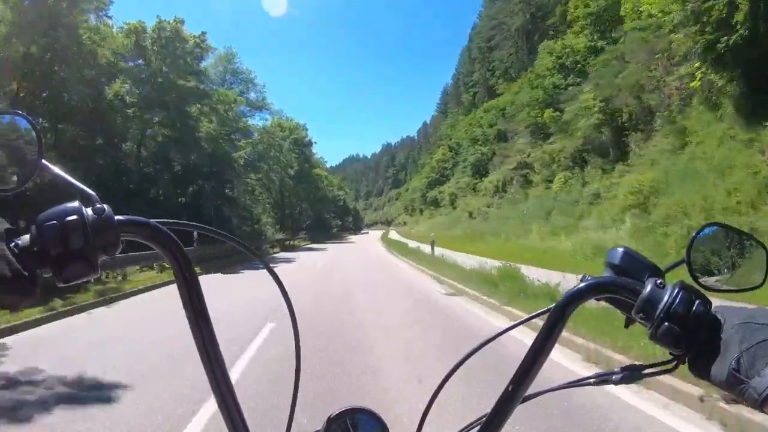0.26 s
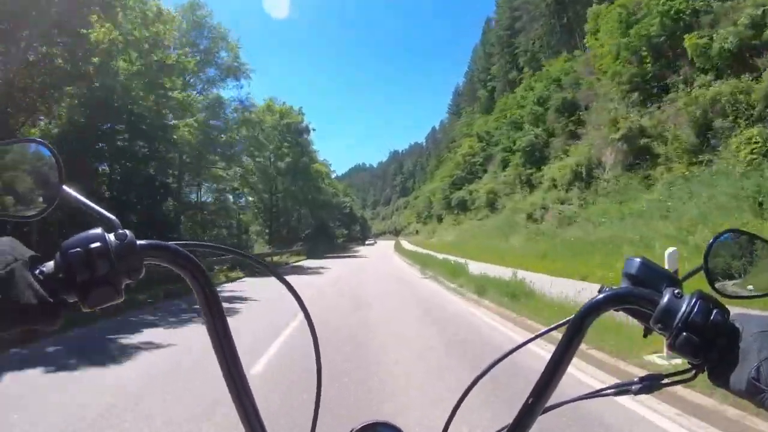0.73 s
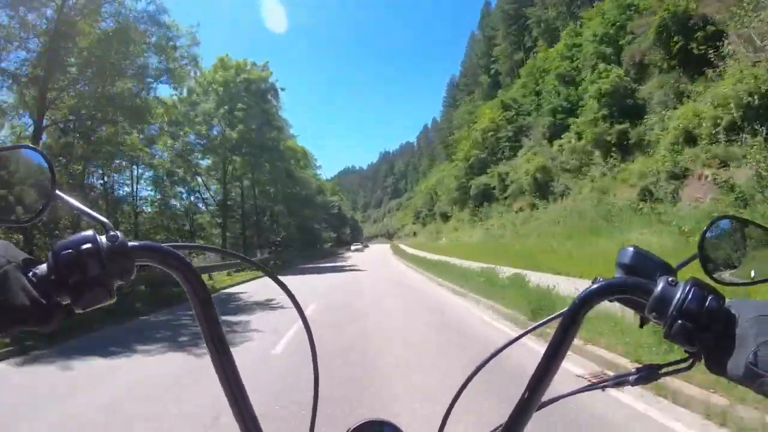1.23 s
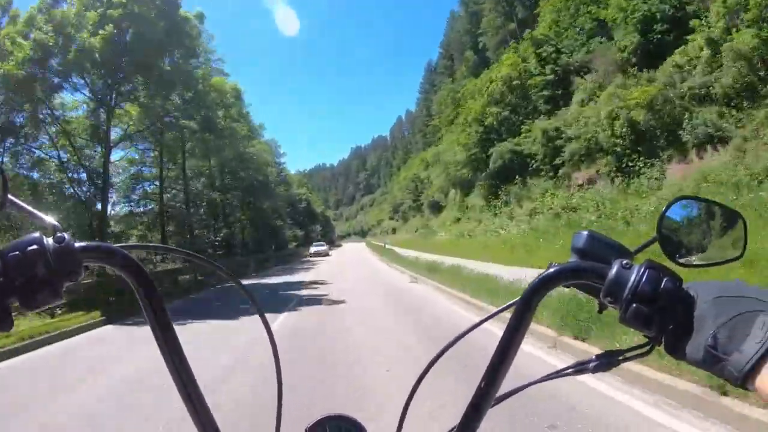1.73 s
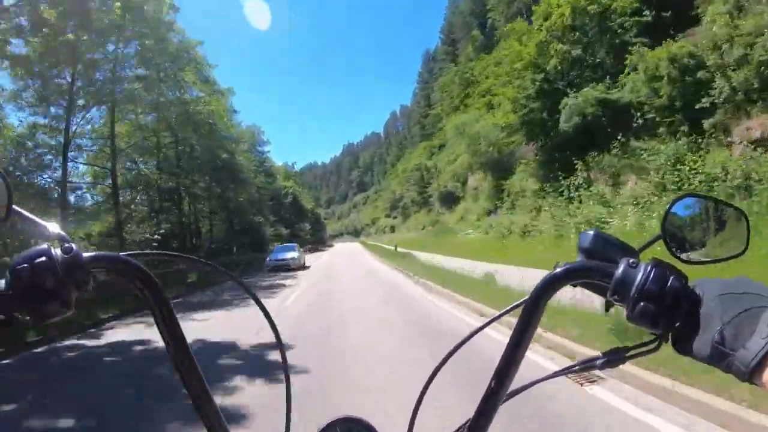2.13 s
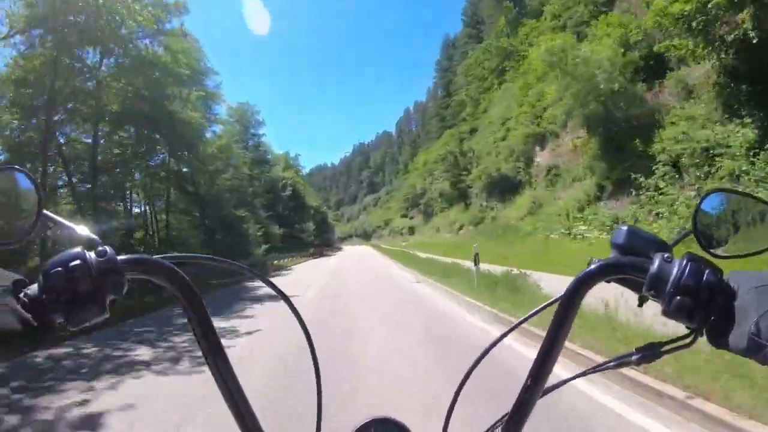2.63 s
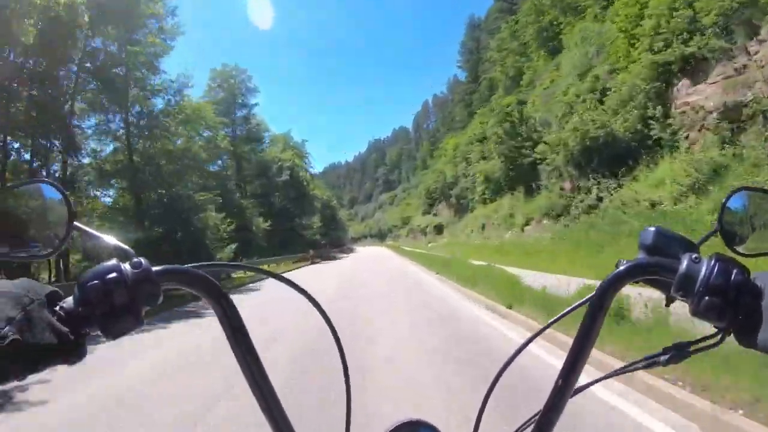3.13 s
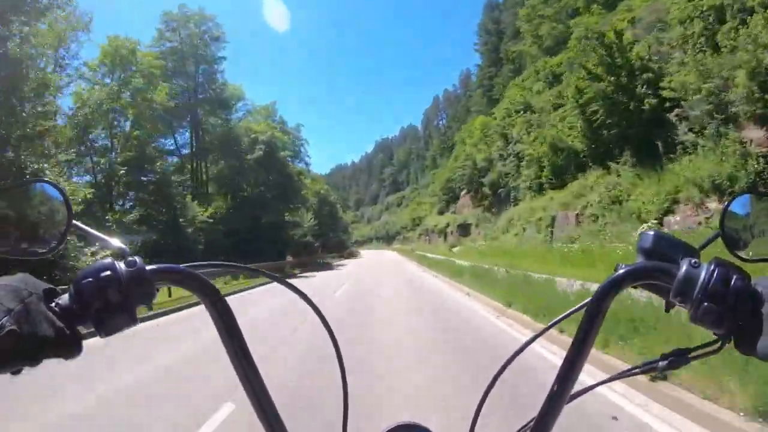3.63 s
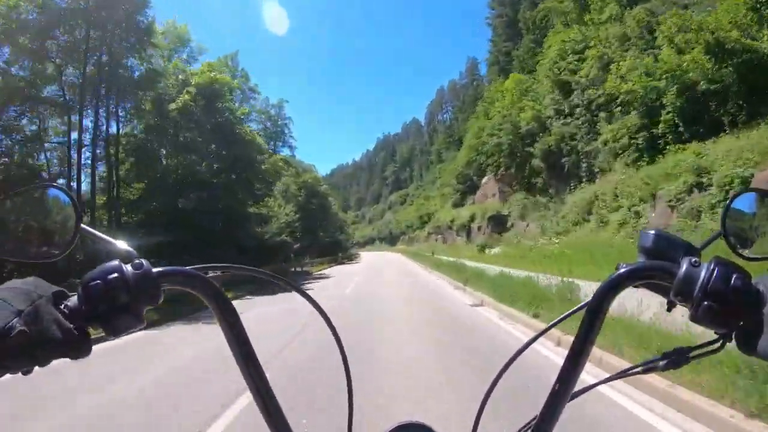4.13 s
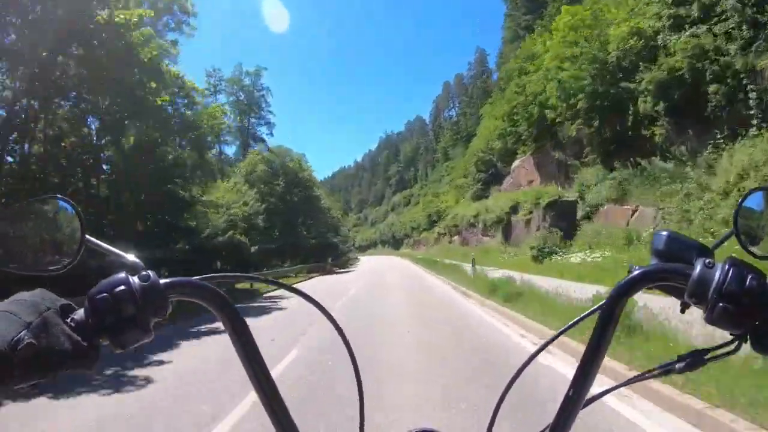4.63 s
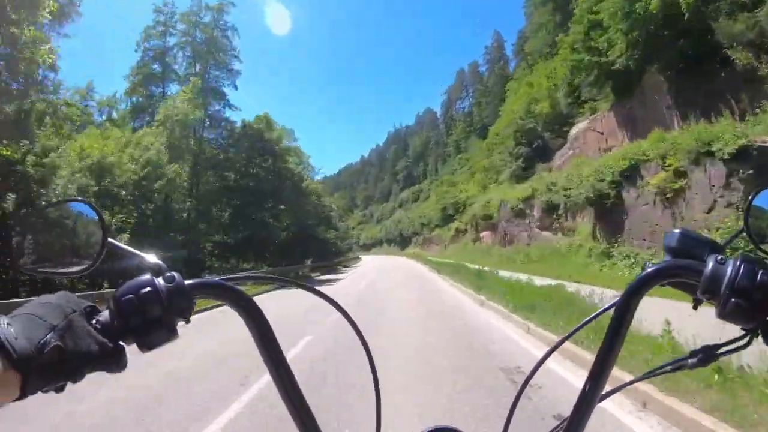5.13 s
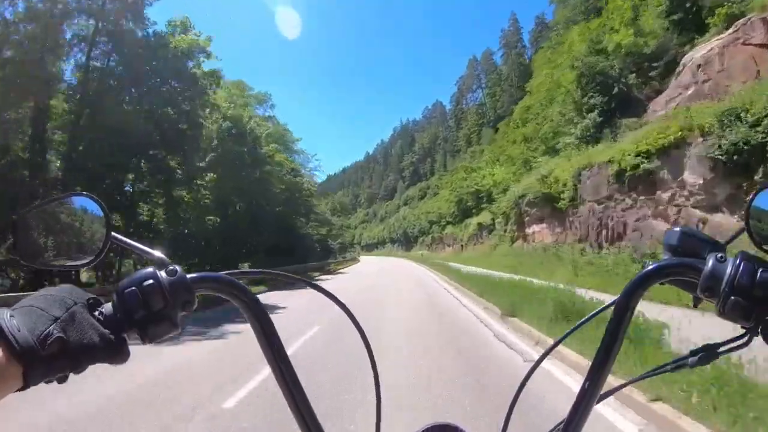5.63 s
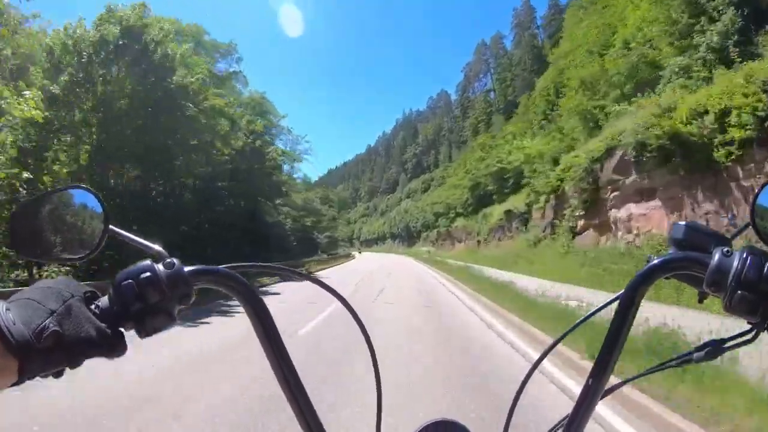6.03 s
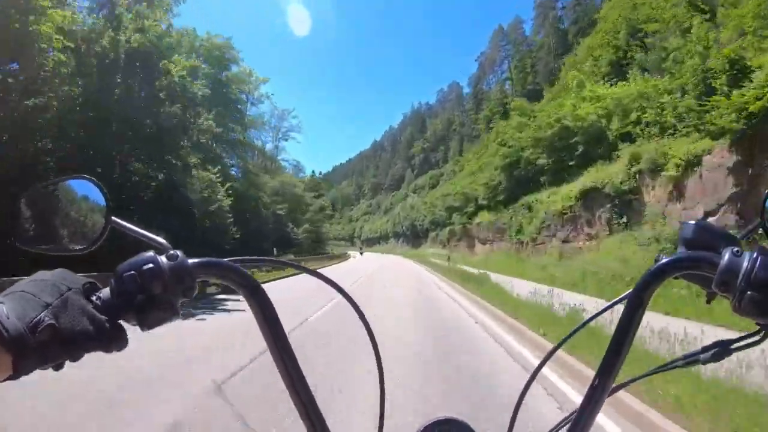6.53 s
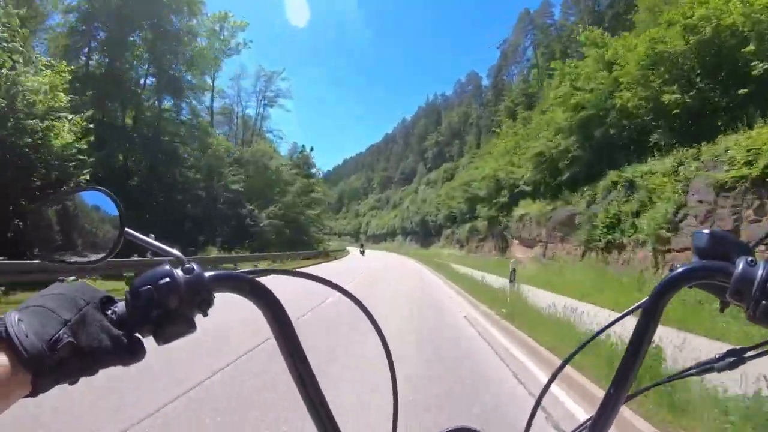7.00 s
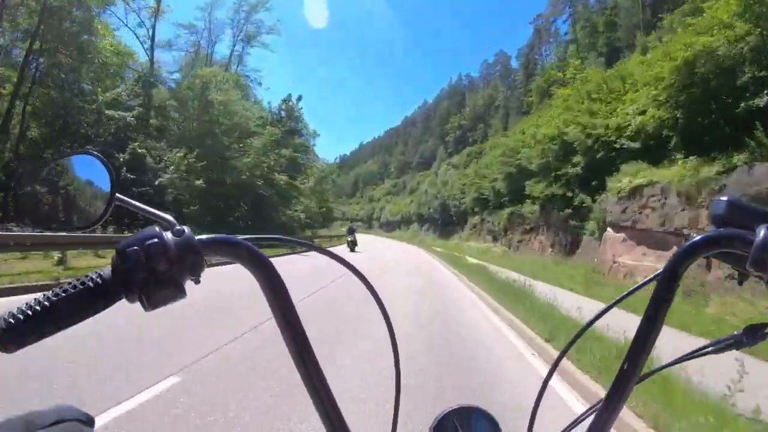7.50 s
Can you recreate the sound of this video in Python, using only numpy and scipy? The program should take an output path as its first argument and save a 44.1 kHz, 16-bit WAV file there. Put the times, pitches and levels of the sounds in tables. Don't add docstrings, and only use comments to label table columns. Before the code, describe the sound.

Close onboard motorcycle sound outdoors: a deep, lumpy exhaust drone, dry mechanical clatter with a thin metallic singing, faint tyre hiss and constant wind turbulence. An oncoming car whooshes past in the first three seconds while a bump shakes loose parts. Steady cruising follows, then the engine slackens, stumbles irregularly and settles slightly slower under increasingly strong wind buffets and a last bump.

```python
import sys
import numpy as np
from scipy import signal
from scipy.fft import rfft, irfft
from scipy.io import wavfile
from scipy.ndimage import uniform_filter1d, map_coordinates

SR = 44100
rng = np.random.default_rng(int(sys.argv[2]) if len(sys.argv) > 2 else 0)


def materialize(psi):
    bounded = np.clip(np.atleast_2d(psi).T, -1, 1)
    quanta = np.round(bounded * 32767).astype(np.int16)
    wavfile.write(sys.argv[1], SR, quanta)


def natural_amplitude(level_db):
    exponent = np.asarray(level_db, float) / 20
    return 10 ** exponent


N = 342216
TIME_S = np.arange(N) / SR
LEAD = 1400
EASE_S, SHUT_S, SHUTTING_S = 5.22, 5.92, 0.11


def unit(x):
    return x / np.sqrt(np.mean(x ** 2) + 1e-20)


def along(points, hz):
    f, v = np.transpose([*points, (30000, -160)])
    return np.interp(np.log(hz + 1), np.log(f + 1), v)


def curve(rows):
    s, value = np.transpose(rows)
    return np.interp(TIME_S, s, value)


def wobble(rate_hz):
    knots = rng.standard_normal(int(N * rate_hz / SR) + 4)
    return map_coordinates(knots, [np.arange(N) * rate_hz / SR])


def coloured(x, spectrum):
    m = 2 ** 19
    cep = irfft(np.log(natural_amplitude(along(spectrum, np.fft.rfftfreq(m, 1 / SR)))), m)
    cep[1:m // 2] *= 2
    cep[m // 2 + 1:] = 0
    running = np.concatenate([x[-LEAD:], x])
    return irfft(rfft(running, m) * np.exp(rfft(cep)), m)[LEAD:][:N]


def rush(spectrum, patchy_db):
    z = signal.stft(rng.standard_normal(N), nperseg=512)[2]
    field = uniform_filter1d(rng.standard_normal(z.shape), size=6, axis=0)
    field = uniform_filter1d(field, size=10, axis=1)
    patchy = signal.istft(z * natural_amplitude(patchy_db * unit(field)), nperseg=512)[1][:N]
    return unit(coloured(patchy, spectrum))


def levelled(x, size, floor):
    return x / np.sqrt(np.abs(uniform_filter1d(x ** 2, size=size)) + floor)


def swells(rows):
    return sum(height * np.exp(-(2 * (TIME_S - s) / length_s) ** 2) for s, height, length_s in rows)


def stroke(turns, at, sharp):
    return np.exp(sharp * (np.cos(2 * np.pi * (turns - at)) - 1))


def shut(start_s):
    return np.clip((TIME_S - start_s) / SHUTTING_S, 0, 1)


# time_s, speed_cycles_per_s (four-stroke)
ENGINE = [(0.0, 22.082), (0.3, 22.053), (0.6, 22.187), (2.4, 22.628), (2.7, 22.625), (3.0, 22.71),
          (4.2, 22.716), (4.5, 22.802), (4.8, 22.654), (5.1, 22.653), (5.4, 22.615), (6.0, 22.455),
          (6.2, 21.967), (6.6, 22.135), (6.8, 21.741), (7.0, 21.744), (7.2, 21.631), (7.76, 21.61)]


def engine_speed():
    return curve(ENGINE)


# time_s, load_db
LOAD = [(0, -2), (.5, -3), (.9, -2), (1.35, 1), (2.0, 0), (2.65, -4.5), (2.95, -3.5), (3.3, -2), (4.2, -1),
        (5.15, 0.5), (5.35, -2.5), (5.65, -3.5), (6.0, -1), (6.4, -3), (6.95, -6), (7.2, -3), (7.76, -4)]


def engine_load():
    return curve(LOAD)


# time_s, unevenness_0_to_1
RAGGED = [(0, .05), (5.4, .05), (5.9, .12), (6.15, .55), (6.6, .45), (6.85, .17), (7.3, .12), (7.76, .12)]
# pitch_hz, level_db
PIPE = [(15, -40), (45, -13), (68, -17), (90, -1), (113, -2), (136, 5), (158, -3), (204, -2.7), (228, -13),
        (260, -23), (295, -28), (362, -29), (450, -37), (900, -70)]
# pitch_hz, gain_db
COASTING = [(15, -2.5), (110, 2.5), (131, 1.5), (152, -3), (196, 1), (260, -6), (20000, -5)]
# pitch_hz, gain_db
LEAN = [(15, 0), (112, 0), (134, -10), (158, -5), (190, 0), (20000, 0)]
# pitch_hz, level_db
BARK = [(120, -40), (160, -12), (181, 1), (204, -5), (227, -6), (250, -4), (272, -4), (286, 3), (298, 3),
        (308, -8), (318, -5), (340, -11), (362, -2), (400, -11), (500, -18), (800, -36), (2000, -80)]


def exhaust(turns):
    rear_at_cycle, rear_db = 405 / 720, 1.4
    ragged = curve(RAGGED)
    whole = np.arange(int(turns[-1]) + 1)
    fire_turns = np.stack([whole, whole + rear_at_cycle], axis=1).ravel()
    fire = np.interp(fire_turns, turns, np.arange(N))
    late, strong = rng.standard_normal((len(fire), 2)).T
    rough = ragged[fire.astype(int)]
    fire = np.clip(fire + rough * late * .0022 * SR, 0, N - 1).astype(int)
    size = natural_amplitude(9 * rough * strong + np.resize([0, rear_db], len(fire)))

    both = np.bincount(fire, size, minlength=N)
    pull = unit(coloured(both - both.mean(), PIPE))
    closed = shut(SHUT_S)
    drone = (1 - closed) * pull + closed * coloured(pull, COASTING)
    lean = np.clip(3 * ragged - .35, 0, 1)
    drone = (1 - lean) * drone + lean * coloured(drone, LEAN)
    drone = natural_amplitude(1.8 * wobble(6)) * drone

    near = np.bincount(fire[::2], size[::2], minlength=N)
    bark = natural_amplitude(-15) * unit(coloured(near, BARK))
    return natural_amplitude(-13.57 + engine_load()) * (drone - bark)


# pitch_hz, density_db_per_hz
CASE = [(1200, -22), (1900, -7.5), (2500, -3), (3100, -7.5), (4000, -16.5), (5200, -21.5), (6000, -28.5),
        (8000, -66.5)]
# pitch_hz, width_hz, level_db
FINS = [(2178, 18, -4), (2225, 20, -11), (2360, 22, -3), (2400, 30, -9), (2475, 20, -11), (2540, 160, -6),
        (2655, 25, -8), (2790, 70, -13), (3000, 50, -14)]


def valve_gear(turns):
    beat = 1 + 0.099 * stroke(turns, 0.034, 8.1) + 0.47 * stroke(turns, 0.57, 4.1)
    ticks = coloured(rng.standard_normal(N) * natural_amplitude(1.9 * wobble(700)), CASE)
    case = unit(beat * (rush(CASE, patchy_db=-0.5) + 0.36 * unit(ticks)))

    hz = np.fft.rfftfreq(N, 1 / SR)
    fins = sum(natural_amplitude(db) * 1j * hz * w / (c * c - hz * hz + 1j * hz * w) for c, w, db in FINS)
    ring = levelled(unit(irfft(rfft(ticks) * fins, N)), 1500, .05)

    eased = shut(EASE_S)
    stream_db = air_stream()
    stream_db = stream_db - stream_db.mean()
    match = np.exp(-((engine_speed() - 22.3) / .1) ** 2)
    sing_db = -0.9 - 0.73 * stream_db - 10.5 * eased + 3 * match
    clatter_db = -40 + 0.94 * engine_load() + 2.5 * eased
    clatter_db = clatter_db + 0.11 * gusts() + 0.4 * stream_db
    return natural_amplitude(clatter_db) * (case + natural_amplitude(sing_db) * ring)


# pitch_hz, match_cycles_per_s, reach_cycles_per_s, level_db
WHINES = [(2360, 22.3, .12, -40.5), (2178, 22.68, .07, -50)]


def whine():
    speed, load_db = engine_speed(), engine_load()
    out = np.zeros(N)
    for hz, at, reach, db in WHINES:
        level = natural_amplitude(db + 1.5 * load_db + 1.1 * wobble(11))
        match = np.exp(-((speed - at) / reach) ** 2)
        out += level * match * np.sin(2 * np.pi * hz * TIME_S + 0.4 * wobble(25))
    return (1 - shut(EASE_S)) * out


# time_s, level_db
WIND = [(0, -26.5), (.44, -31), (.69, -34.5), (1.1, -33), (1.72, -33.5), (1.95, -28.5), (2.6, -30),
        (2.82, -35.5), (2.9, -32.5), (3.4, -31.5), (4.4, -31.5), (5.3, -32), (5.7, -34.5), (6.85, -34.5),
        (7.2, -32.5), (7.45, -32.5), (7.76, -26.5)]


def air_stream():
    return curve(WIND)


# time_s, level_db
HEAVE = [(0, -40), (2, -35.5), (4.2, -31), (4.7, -23.5), (5.8, -23.5), (6.3, -19), (6.8, -30), (7.76, -36)]
# pitch_hz, density_db_per_hz
DEEP = [(10, -25), (25, -5.5), (38, -0.5), (55, -10), (90, -31.5)]
# pitch_hz, density_db_per_hz
RUMBLE = [(10, -25), (25, -12.5), (40, -4.5), (75, -2.5), (100, -8.5), (140, -11), (215, -10), (250, -18),
          (300, -24), (450, -31.5), (900, -61.5)]
# pitch_hz, density_db_per_hz
FLUTTER = [(120, -23), (250, -2.5), (400, -4.5), (700, -12), (1200, -13.5), (1800, -21), (3500, -27.5),
           (5500, -46.5), (7000, -84)]


def wind(turns):
    gust_db = gusts()
    heave = natural_amplitude(curve(HEAVE)) * rush(DEEP, patchy_db=0.5)

    slow = wobble(12)
    eddies = levelled(rush(RUMBLE, patchy_db=.6), 6000, .1)
    low = unit(natural_amplitude(1.1 * slow + .6 * wobble(5)) * eddies)
    rumble = natural_amplitude(-17.5 + .05 * gust_db) * low

    lumps = natural_amplitude(0.23 * slow + 0.49 * wobble(90)) * (1 + 0.24 * stroke(turns, 0.11, 11))
    flutter = unit(lumps * rush(FLUTTER, patchy_db=0.8))
    return heave + rumble + natural_amplitude(air_stream() + 0.11 * gust_db + 3) * flutter


# pitch_hz, density_db_per_hz
HISS = [(2500, -20), (4200, 5), (5500, 3), (6200, 0), (7800, -1), (9000, -7), (9500, -16), (10700, -14),
        (11300, -23), (12000, -30), (13400, -28), (14300, -44), (16000, -55)]


def road():
    return natural_amplitude(-51.5 + 0.27 * engine_load() - 2 * shut(EASE_S)) * rush(HISS, patchy_db=.8)


# centre_s, level_db, length_s
SURGES = [
    (0.093, -24.5, 0.097),
    (0.33, -22.5, 0.24),
    (1.816, -7, 0.058),
    (1.89, -23, .06),
    (2.756, -18, 0.084),
    (5.383, -22, 0.062),
    (6.095, -25.5, 0.11),
    (6.596, -28, 0.087),
    (7.163, -29, .1),
    (7.4, -27.5, 0.13),
]
# pitch_hz, density_db_per_hz
SURGE = [(40, -27), (100, 3.5), (220, 0.5), (400, -3.5), (700, -27), (1500, -42.5)]


def surges():
    return swells([(s, natural_amplitude(db), length_s) for s, db, length_s in SURGES]) * rush(SURGE, patchy_db=6.5)


# start_s, peak_db, brightness_db
SLAPS = [(0.291, -21, 1), (0.336, -15, -10), (0.365, -24.5, -12), (0.43, -15.5, -12), (0.452, -22.5, -6.5),
         (1.06, -23, -11), (1.168, -27, -25), (1.82, -13.5, -22), (1.876, -25.5, -16), (1.937, -19.5, -27),
         (2.515, -18.5, -14), (2.566, -19, -9), (2.77, -17.5, -23), (2.838, -16, -28), (3.429, -19, -25),
         (4.156, -20, -5), (4.416, -22.5, -8), (5.127, -21, -28), (5.267, -12, -16), (5.318, -16, -26),
         (5.369, -12, -9), (5.381, -14.5, -7.5), (5.41, -21, -23), (5.934, -19, -14), (6.344, -12.5, -27),
         (6.405, -18, -18), (6.577, -29, -22), (6.609, -21, -2), (6.63, -16.5, -18), (6.749, -21, -5),
         (6.873, -18.5, -34), (6.942, -10, -15), (7.098, -14, -10), (7.106, -16, -17), (7.149, -19, -7),
         (7.158, -12.5, -11.5), (7.189, -12.5, -30), (7.332, -24, -16), (7.367, -12, -18),
         (7.414, -15.5, -10), (7.475, -21.5, -6), (7.612, -20, -19), (7.703, -10, -12), (7.712, -8.5, -9),
         (7.716, -17.5, -12), (7.72, -17.5, -10), (7.73, -14, -10)]


def slaps():
    dull, bright, t = np.zeros(N + SR), np.zeros(N + SR), np.arange(SR // 20) / SR
    for s, db, bright_db in SLAPS:
        puff = rng.standard_normal((2, len(t))) * (1 - np.exp(-t / .001)) * np.exp(-t / .0035)
        puff /= np.linalg.norm(puff, axis=1, keepdims=True)
        puff[0] *= .5
        puff[0, 40] -= 1.4
        start = round((s + .0015) * SR)
        dull[start:][:len(t)] += natural_amplitude(db) * puff[0]
        bright[start:][:len(t)] += natural_amplitude(db + bright_db) * puff[1]
    thump_hz_db = [(60, -40), (250, 9.5), (700, -2.5), (1500, -12.5), (3000, -31), (8000, -58.5)]
    edge_hz_db = [(500, -29.5), (900, -0.5), (1400, 7), (1900, 5), (3000, -1.5), (5000, -15.5), (7000, -71)]
    return natural_amplitude(27) * coloured(dull[:N], thump_hz_db) + natural_amplitude(23) * coloured(bright[:N], edge_hz_db)


# centre_s, rise_db, length_s
GUSTS = [(0.363, 3, 0.23), (0.548, 4, 0.28), (1.804, 6.5, 0.072), (1.897, 4.5, 0.076), (2.312, 3.5, 0.055),
         (2.536, 1.5, 0.16), (2.748, 6, 0.17), (2.834, 3, 0.019), (3.452, 3.5, 0.08), (4.597, 3.5, 0.12),
         (5.132, 6.5, 0.023), (5.265, 6.5, 0.016), (5.38, 7.5, 0.03), (5.419, 8, 0.015), (6.232, 6.5, 0.02),
         (6.34, -0.5, 0.16), (6.872, 4.5, 0.0085), (6.944, -3, 0.03), (7.102, 9.5, 0.045),
         (7.161, 7.5, 0.073), (7.569, 8, 0.025), (7.623, 3, 0.067), (7.716, 10.5, 0.056)]


def gusts():
    return swells(GUSTS)


# pitch_hz, density_db_per_hz
BUFFET = [(90, -26.5), (200, 3), (350, -1), (550, -3.5), (1000, -11), (2500, -29), (4500, -41.5),
          (7000, -71.5)]


def buffets():
    eddies = natural_amplitude(3 * wobble(110)) * rush(BUFFET, patchy_db=2)
    return natural_amplitude(-24) * (natural_amplitude(gusts()) - 1) * levelled(eddies, 1800, 1e-3)


# time_s, level_db
CAR = [(0, -59), (1.22, -54), (1.33, -37), (1.75, -36), (2.1, -45), (2.6, -43.5), (2.76, -44),
       (2.86, -60.5), (7.76, -61)]
# pitch_hz, density_db_per_hz
TYRES = [(500, -29), (850, -4), (1150, 2), (1500, -2.5), (1900, -9.5), (3000, -21), (6000, -50.5)]


def car():
    return natural_amplitude(curve(CAR)) * rush(TYRES, patchy_db=1.5)


# start_s, pitch_hz, level_db, length_s, width_hz
RATTLES = [
    (1.872, 2500, -24, .02, 1200),
    (1.879, 4900, -36, .014, 700),
    (1.912, 4500, -44, .016, 900),
    (1.995, 3800, -42, .06, 600),
    (2.0, 4400, -38.5, .095, 900),
    (2.03, 4900, -43, .075, 600),
    (7.69, 4000, -39, .11, 1300),
]


def rattles():
    out, t = np.zeros(N + SR), np.arange(SR // 5) / SR
    for s, hz, db, length_s, width_hz in RATTLES:
        band = np.exp(-((np.fft.rfftfreq(len(t), 1 / SR) - hz) / width_hz) ** 2)
        narrow = unit(irfft(rfft(rng.standard_normal(len(t))) * band, len(t)))
        swell = np.sin(np.pi * np.clip(t / length_s, 0, 1)) ** 2
        out[round(s * SR):][:len(t)] += natural_amplitude(db) * narrow * swell
    return out[:N]


def scene():
    turns = np.cumsum(engine_speed()) / SR + .064
    engine = exhaust(turns) + valve_gear(turns) + whine()
    air = wind(turns) + surges() + slaps() + buffets()
    return (engine + air + road() + car() + rattles())[None]


def roll_off(x):
    return signal.sosfilt(signal.butter(12, 15500, fs=SR, output="sos"), x)


def record(dry):
    window = np.hanning(1500) / 750
    power = np.abs(signal.fftconvolve(dry ** 2, window[None], "same")) + 1e-6
    even = dry * (power / natural_amplitude(-27)) ** -.19
    soft = even / (1 + (even / .95) ** 4) ** .25
    to_edge = np.minimum(np.arange(N), np.arange(N)[::-1])
    return roll_off(soft * np.clip(.6 + to_edge / 300, 0, 1))


dry = scene()
out = record(dry)
materialize(out)
```